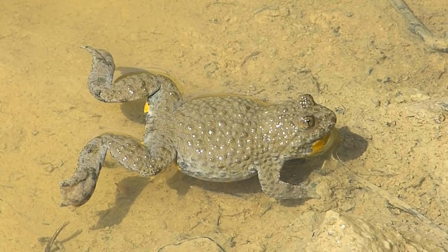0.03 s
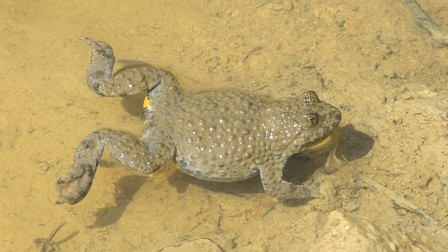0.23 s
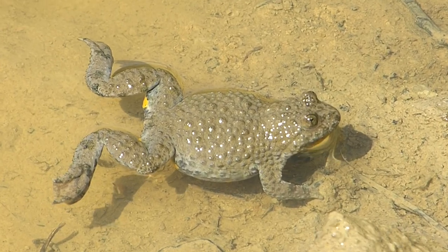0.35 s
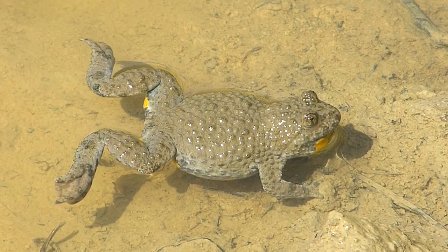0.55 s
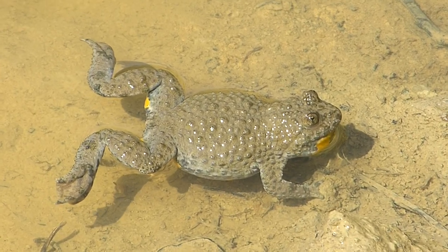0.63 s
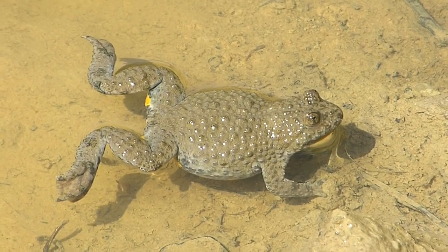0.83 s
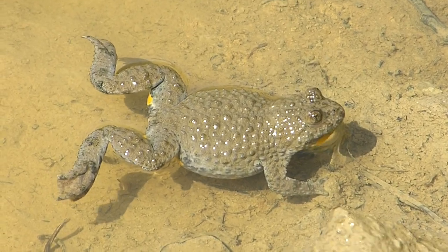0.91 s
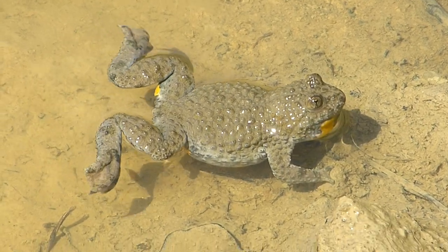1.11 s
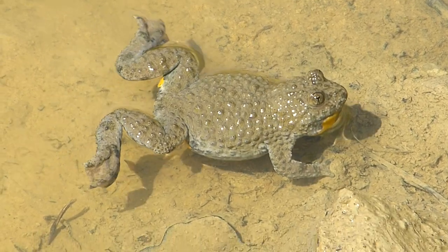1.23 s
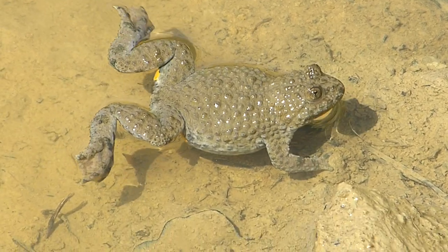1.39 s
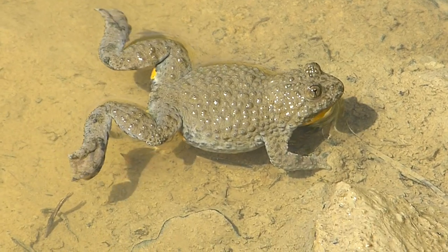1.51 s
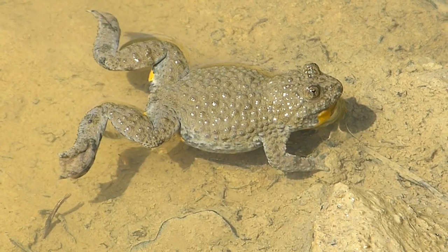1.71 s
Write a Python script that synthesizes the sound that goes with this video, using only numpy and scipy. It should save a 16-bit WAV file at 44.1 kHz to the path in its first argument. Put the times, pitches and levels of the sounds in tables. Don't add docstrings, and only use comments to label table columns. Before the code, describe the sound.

A toad hoots three times, soft, round and whistle-like, at about 0.2, 0.75 and 1.3 seconds, each under 0.2 seconds and sagging at the end. A quick bird chirp opens, then plastic handling ticks and a loud snap at 0.26. From 0.6 a bird buzzes on the right, swelling; another trills rapidly from 1.0 to 1.6. Leaves, faint far toads and low traffic hum continue underneath.

```python
import sys
import numpy as np
from scipy import signal
from scipy.io import wavfile
from scipy.ndimage import uniform_filter1d

SR = 44100
rng = np.random.default_rng(int(sys.argv[2]) if len(sys.argv) > 2 else 0)


def convert_level_to_amplitude(level_db):
    exponent = np.asarray(level_db, float) / 20
    return 10 ** exponent


def wav_out(sig):
    wavfile.write(sys.argv[1], SR, np.round(np.clip(np.atleast_2d(sig).T, -1, 1) * 32767).astype(np.int16))


N = 77175


def level(x, db):
    return x * convert_level_to_amplitude(db) / np.sqrt(np.mean(x ** 2))


def band(x, hz, width):
    return signal.lfilter(*signal.iirpeak(min(hz, 0.45 * SR), hz / width, fs=SR), x)


def walk(rate):
    hold = int(SR / rate)
    steps = np.repeat(rng.standard_normal(N // hold + 1), hold)
    return 1.5 * uniform_filter1d(uniform_filter1d(steps, hold), hold)[:N]


def pan(x, db):
    return np.array([x * convert_level_to_amplitude(db / 2), x * convert_level_to_amplitude(-db / 2)])


def late(x, s):
    return np.interp(np.arange(N) - s * SR, np.arange(N), x, left=0)


def chirp(t, start, length, hz0, hz1, db, depth=0, swing_hz=0):
    warble_hz = 150
    out = np.zeros(N)
    at = slice(int(start * SR), int((start + length) * SR))
    u = (t[at] - start) / length
    beat = 2 * np.pi * warble_hz * u * length
    hz = hz0 + (hz1 - hz0) * u + swing_hz * np.sin(beat)
    phase = 2 * np.pi * np.cumsum(hz) / SR
    swell = np.sqrt(2 * np.abs(np.sin(np.pi * u)))
    pulses = 1 - np.clip(depth, 0, 1) * np.cos(beat)
    out[at] = convert_level_to_amplitude(db) * swell * pulses * np.sin(phase)
    return out


def field(t):
    # frequency [Hz], density [dB per Hz].
    spectrum = [(15, -38), (25, -11), (149, -1), (936, -3.5), (1890, -9), (2110, -11), (2990, -15.5),
                (7510, -14.5), (16000, -29.5)]
    # frequency [Hz], side over mid [ratio].
    spread = [(30, 0.98), (80, 0.15), (300, 1), (1000, 1), (4000, 0.53), (12000, 0.61)]
    # centre [s], spread [s], lift [dB].
    rustles = [
        (.15, 0.011, 7),
        (.48, 0.04, 2),
        (.71, 0.043, 4.5),
        (1.66, .04, 2.5),
    ]
    # centre [s], spread [s], frequency [Hz], lift [dB].
    murmurs = [
        (0.081, 0.25, 530, 7),
        (1.156, 0.21, 530, 6.5),
        (0.72, 0.2, 500, 5),
    ]
    out, swell = 0, walk(3)
    rustle_db = sum(db * np.exp(-((t - s) / w) ** 2) for s, w, db in rustles)
    calls = [(f, db * np.exp(-((t - s) / w) ** 2)) for s, w, f, db in murmurs]
    shape_hz, shape_db = np.array(spectrum).T
    wide_hz, wide_ratio = np.array(spread).T
    for hz in 28 * 2 ** (np.arange(28) / 3):
        mid, side = (band(band(rng.standard_normal(N), hz, hz / 3), hz, hz / 3) for _ in range(2))
        db = np.interp(np.log(hz), np.log(shape_hz), shape_db)
        db = db + 0.1 * swell + 0.74 * walk(9.06)
        db = db + rustle_db * np.exp(-np.log2(hz / 6500) ** 2 / 0.22)
        db = db + sum(bump * np.exp(-np.log2(hz / f) ** 2 / 0.051) for f, bump in calls)
        width = np.interp(np.log(hz), np.log(wide_hz), wide_ratio)
        out = out + convert_level_to_amplitude(db) * (mid + width * side * np.array([[1], [-1]]))
    hum = level(band(rng.standard_normal(N), 158, 19), -70)
    return level(out, -57.5) + hum


def lone_chirps(t):
    # start [s], length [s], from [Hz], to [Hz], level [dB].
    glides = [
        (.046, .014, 4535, 4790, -52),
        (.056, 0.0064, 5260, 4420, -52),
        (.061, 0.0082, 4400, 3650, -50),
        (.067, .013, 3640, 3140, -61),
        (0.147, 0.013, 4840, 3900, -66),
        (.543, 0.0117, 2900, 3700, -66),
        (.55, 0.019, 3770, 3890, -63.5),
        (.991, 0.014, 5010, 4500, -54.5),
        (1.65, 0.022, 4500, 3810, -63),
    ]
    return sum(chirp(t, *row) for row in glides)


def shell():
    # start [s], peak [dB], pan [dB], brightness [dB per octave].
    clicks = [
        (.1025, -31, -6.5, 1.8),
        (.199, -47.5, -4, 20),
        (0.257, -32.5, 0, 10),
        (0.2611, -5.5, -6.5, 2.13),
        (.595, -58, -7, 8),
        (.697, -56, -1, 5),
        (0.813, -48, -5, 9),
        (0.991, -43, -11, 5),
        (1.65, -48, -7, -6),
    ]
    # frequency [Hz], level [dB], decay time T60 [s].
    modes = [(445, -14, 0.048), (711, -2, 0.045), (900, -14, 0.077), (1168, -2.5, 0.024),
             (1464, -13.5, 0.038), (1755, -10.5, 0.03), (2375, -5, 0.018), (2770, -10.5, 0.022),
             (3770, -4, 0.011), (4300, 0.5, 0.0095), (5070, -5.5, 0.0096), (5950, 5.1, 0.011),
             (6760, -1.5, 0.0097), (8300, -6.5, 0.0075)]
    slip_s, left_lag_s, scatter_db = 0.00027, 0.00075, 0.5
    out, n = np.zeros((2, N)), np.arange(SR // 16) / SR
    edges = signal.butter(3, [360, 9800], "band", fs=SR, output="sos")
    for start, db, pan_db, tilt_db in clicks:
        luck = rng.standard_normal((len(modes), 3))
        for ch in range(2):
            left = 1 - ch
            hit = 0
            for (f, mode_db, t60), (a, b, c) in zip(modes, luck):
                ring_db = mode_db + tilt_db * np.log2(f / 4000) + scatter_db * (1.5 - ch) * a
                ring = convert_level_to_amplitude(ring_db - 60 * n / t60) * (1 - np.exp(-n / slip_s))
                hit = hit + ring * np.sin(2 * np.pi * f * n + np.pi * b + 0.5 * left * c)
            hiss = band(rng.standard_normal(len(n)), 5240, 4700)
            crack = convert_level_to_amplitude(-7.5) * np.exp(-n / 0.0019)
            tail = convert_level_to_amplitude(-20) * np.exp(-n / 0.0043)
            rattle = convert_level_to_amplitude(-42) * np.exp(-n / 0.014)
            hit = hit / np.abs(hit).max() + hiss * (crack + tail + rattle)
            at = int((start + left_lag_s * left) * SR)
            out[ch, at:at + len(n)] += signal.sosfilt(edges, hit) * convert_level_to_amplitude(db + pan_db * left)
    return out


def toad(t):
    # start [s], length [s], pitch [Hz], level [dB], sag [Hz].
    hoots = [
        (0.202, 0.18, 592.6, -36.5, 30.2),
        (.74, 0.19, 592.5, -36, 30),
        (1.296, 0.19, 585.5, -36, 32),
    ]
    # multiple of the pitch, start [dB], end [dB], power of the swell, power of the fade.
    overtones = [(2, -18.5, -24, 0.19, 0.94), (3, -34.5, -20.5, 0.96, 1.2), (4, -42, -31.5, 1.2, 1.3)]
    # lag [s], level [dB].
    bank_echo = [(.036, -39), (.047, -17.5)]
    swell, fade = 0.56, 0.3
    onset_s, onset_share = 0.012, 0.079
    scoop_hz, scoop_s = 25.22, 0.013
    pan_from_db, pan_to_db = -0.8, 1.5
    out, progress = np.zeros(N), np.zeros(N)
    for start, length, hz, db, sag_hz in hoots:
        u = np.clip((t - start) / length, 0, 1)
        rise = np.sin(np.pi / 2 * np.clip(u / swell, 0, 1)) ** 0.78
        rise = (1 - onset_share) * rise + onset_share * np.clip(u * length / onset_s, 0, 1)
        fall = np.sin(np.pi / 2 * np.clip((1 - u) / fade, 0, 1)) ** 0.99
        scoop = scoop_hz * np.exp(-u * length / scoop_s)
        pitch = hz - scoop - sag_hz * u ** 4.1 + 0.71 * walk(39.8)
        phase = 2 * np.pi * np.cumsum(pitch) / SR
        voice = rise * fall * np.sin(phase)
        for k, db0, db1, onset, ending in overtones:
            strength = convert_level_to_amplitude(db0 + (db1 - db0) * u + 0.98 * walk(39.8))
            voice += strength * rise ** onset * fall ** ending * np.sin(round(k) * phase)
        out += convert_level_to_amplitude(db) * np.sqrt(2) * voice
        progress += u * (u < 1)
    turn_db = pan_from_db + (pan_to_db - pan_from_db) * progress ** 0.85
    left_lag = np.array([late(out, 0.00008) - out, 0 * out])
    echo = np.array([convert_level_to_amplitude(db) * late(out, s) for s, db in bank_echo])
    return pan(out, turn_db) + left_lag + echo


def far_toads(t):
    # start [s], length [s], from [Hz], to [Hz], level [dB].
    answers = [
        (1.17, 0.084, 510, 380, -65),
        (1.215, 0.048, 550, 520, -65),
        (1.4, 0.052, 1200, 1200, -68),
        (.43, 0.059, 2110, 2090, -70.5),
    ]
    return sum(chirp(t, *row) for row in answers)


def buzzer(t):
    # time [s], level [dB], top of sweep [Hz], bottom of sweep [Hz].
    effort = [
        (0.581, -76, 4000, 3220),
        (0.652, -70, 4100, 3196),
        (.8, -61, 4360, 3116),
        (0.961, -58, 4925, 3300),
        (1.1, -59.5, 5600, 3548),
        (1.4, -61, 5803, 3686),
        (1.68, -71.5, 5100, 4206),
    ]
    rate_hz, duty = 138, 0.9
    s, db, top, low = np.array(effort).T
    cycle = np.cumsum(rate_hz * (1 + 0.03 * walk(60))) / SR % 1
    u = np.clip(cycle / duty, 0, 1)
    hz = np.interp(t, s, top) * (1 - u) + np.interp(t, s, low) * u
    loud = convert_level_to_amplitude(np.interp(t, s, db, left=-120, right=-120) + 1.15 * walk(140))
    pulse = np.abs(np.sin(np.pi * u)) ** 0.39
    return 1.68 * loud * pulse * np.sin(2 * np.pi * np.cumsum(hz) / SR)


def triller(t):
    # start [s], level [dB], stretch [ratio], lift of the closing slide [dB].
    syllables = [(1.021, -56.5, 0.9, 7.5), (1.075, -54.5, 1.02, 7), (1.136, -53, 1.01, 5.5),
                 (1.19, -53, 1.08, -1), (1.25, -52.5, 1.05, -4), (1.307, -54.5, 1.18, -0.5),
                 (1.37, -53, 0.98, -1.5), (1.43, -55, .95, -2.5), (1.495, -54, .95, -4),
                 (1.557, -59, .7, -8)]
    # start [s], length [s], from [Hz], to [Hz], level [dB].
    parts = [
        (0, .007, 3750, 4350, -6),
        (.004, .015, 4550, 5050, 1.01),
        (.013, .018, 5800, 6500, -15),
        (.024, .012, 5100, 4550, -1),
        (.032, .013, 4300, 3850, -3),
    ]
    depth, swing_hz, scatter_db = 0.85, 220, 1.01
    out = np.zeros(N)
    chance = rng.standard_normal((len(syllables), 2, len(parts)))
    for (start, db, stretch, slide_db), (a, b) in zip(syllables, chance):
        for k, (s, length, hz0, hz1, part_db) in enumerate(parts):
            last = k == len(parts) - 1
            bend = 1 + 0.011 * a[k]
            pulsed = 0.25 if last else 1
            loud_db = db + part_db + last * slide_db + scatter_db * b[k]
            out += chirp(t, start + s * stretch, length * stretch, hz0 * bend, hz1 * bend, loud_db,
                         depth * pulsed, swing_hz * pulsed)
    return out * convert_level_to_amplitude(1.51 * walk(250))


def woods(x):
    t60_s = 0.4
    n = np.arange(SR // 2) / SR
    tail = rng.standard_normal((2, len(n))) * convert_level_to_amplitude(-60 * n / t60_s) * (n > 0.004)
    tail /= np.sqrt(np.sum(tail ** 2, axis=1, keepdims=True))
    return convert_level_to_amplitude(-6.5) * signal.fftconvolve(x[None], tail, axes=1)[:, :N]


def scene():
    t = np.arange(N) / SR
    buzz, trill, chirps = buzzer(t), triller(t), lone_chirps(t)
    birds = pan(buzz, -7.5) + pan(trill + chirps, 0.2)
    echoes = woods(buzz + trill + 0.83 * chirps)
    return field(t) + shell() + toad(t) + pan(far_toads(t), -2.0) + birds + echoes


def top_cut(x):
    return signal.sosfilt(signal.butter(12, 16480, fs=SR, output="sos"), x)


def record(dry):
    return top_cut(dry)


dry = scene()
out = record(dry)
wav_out(out)
```